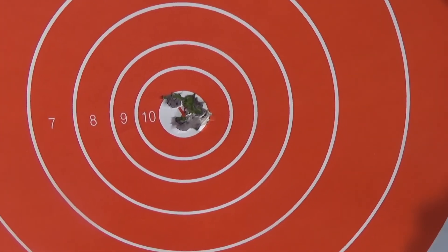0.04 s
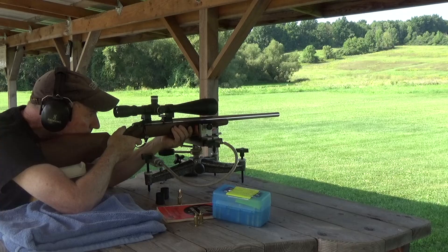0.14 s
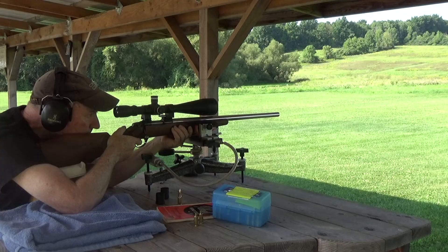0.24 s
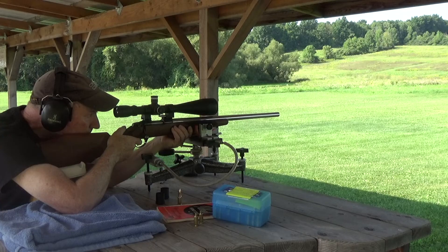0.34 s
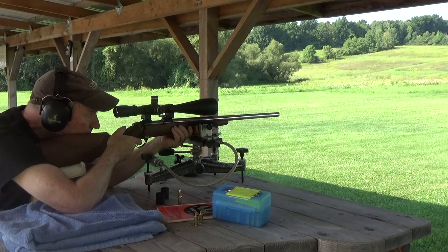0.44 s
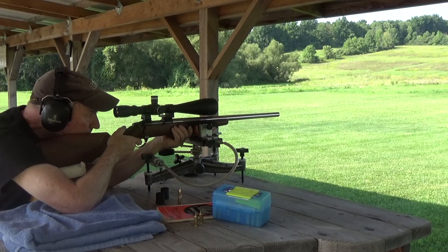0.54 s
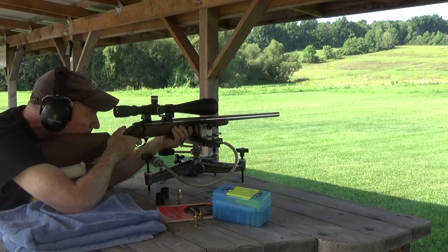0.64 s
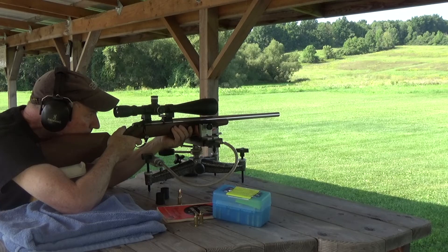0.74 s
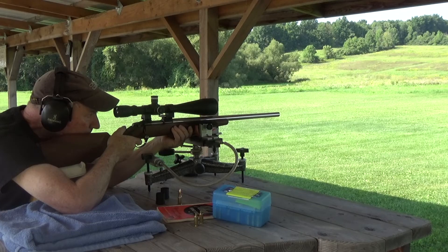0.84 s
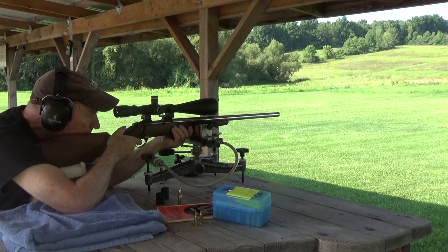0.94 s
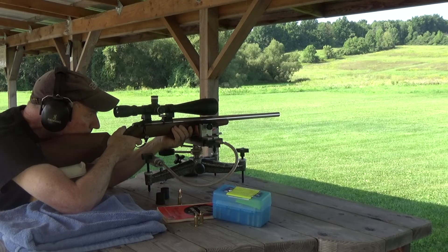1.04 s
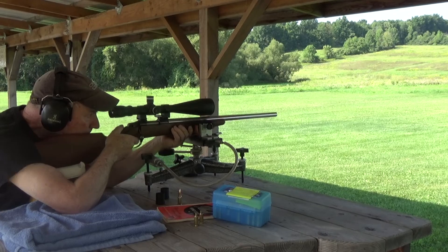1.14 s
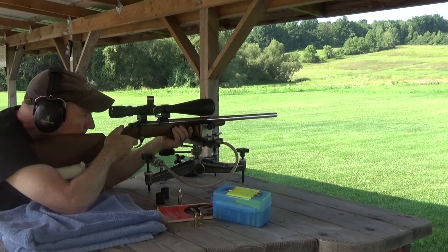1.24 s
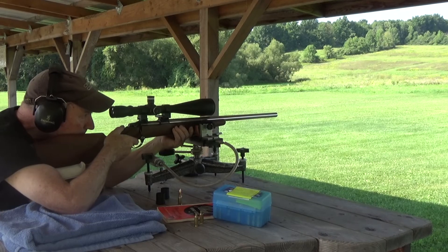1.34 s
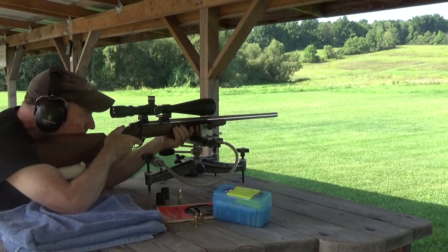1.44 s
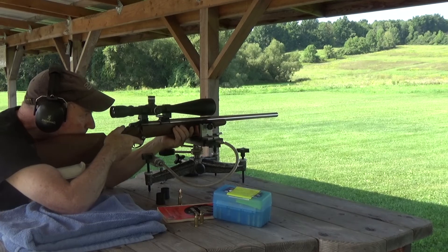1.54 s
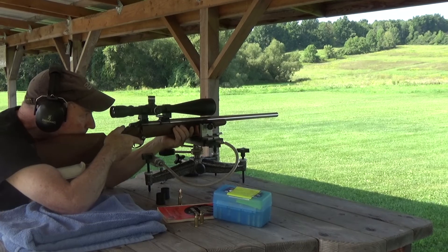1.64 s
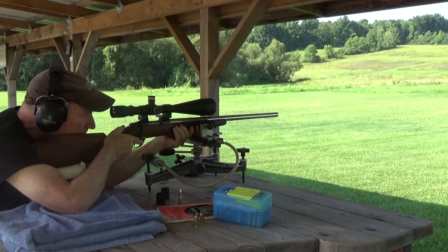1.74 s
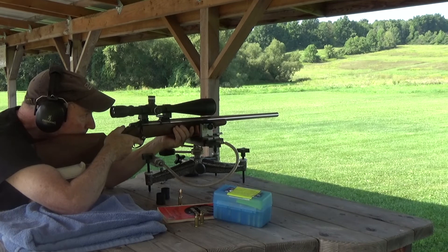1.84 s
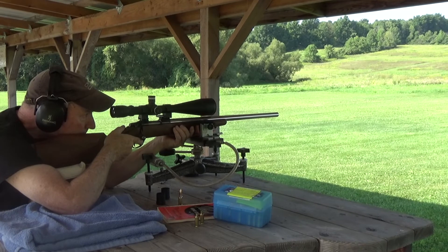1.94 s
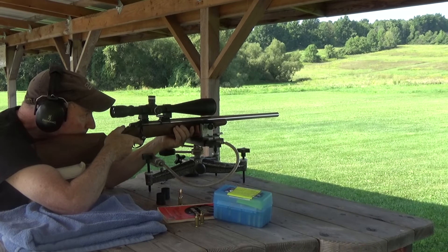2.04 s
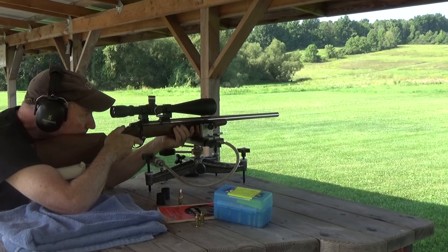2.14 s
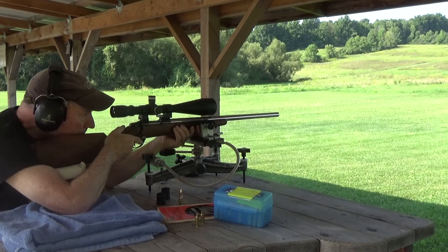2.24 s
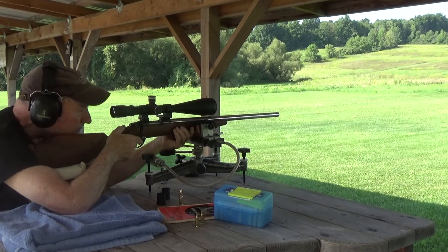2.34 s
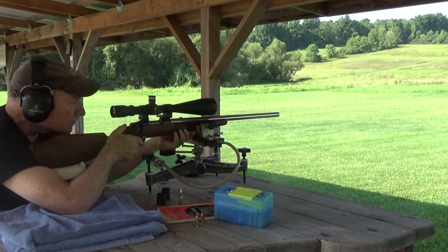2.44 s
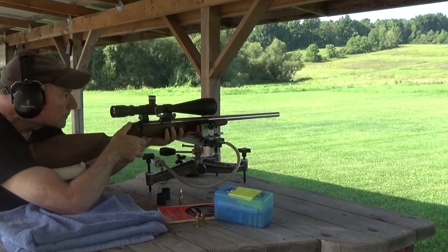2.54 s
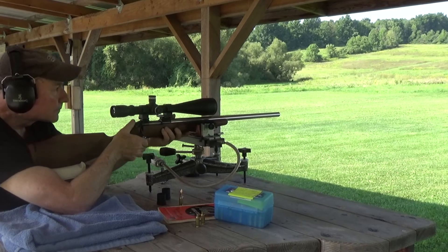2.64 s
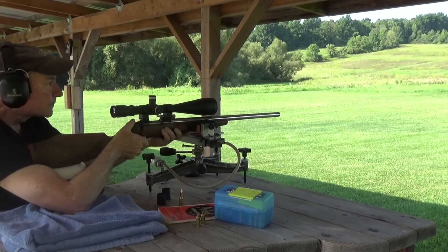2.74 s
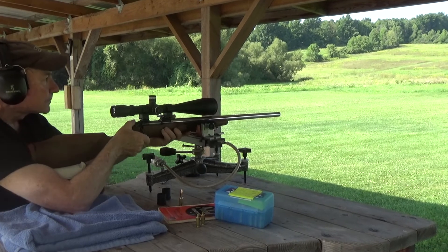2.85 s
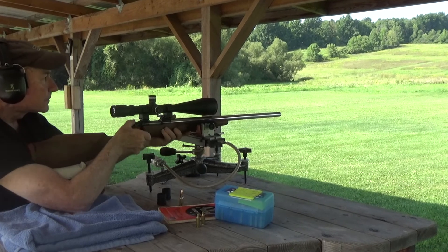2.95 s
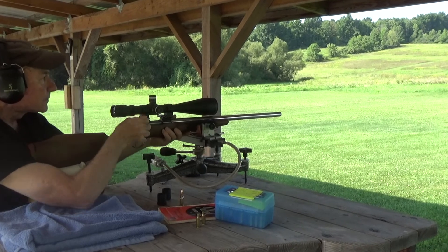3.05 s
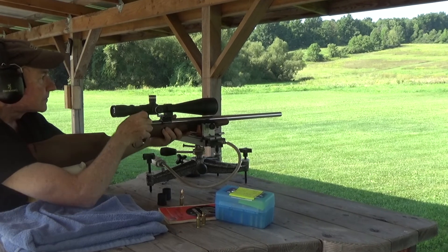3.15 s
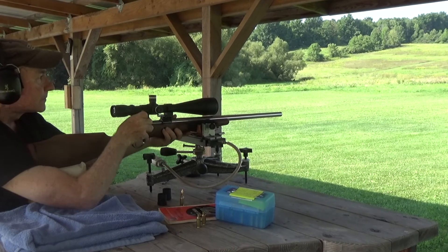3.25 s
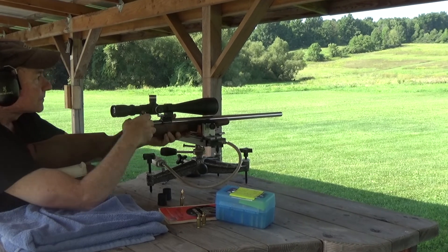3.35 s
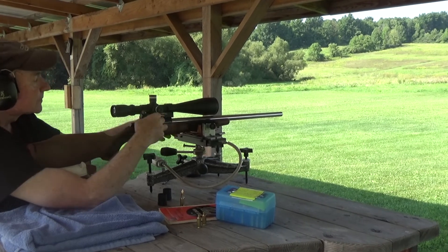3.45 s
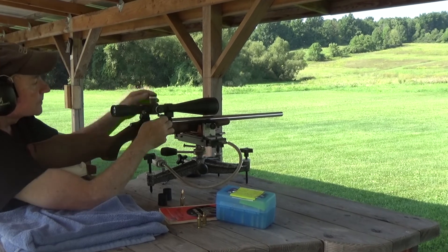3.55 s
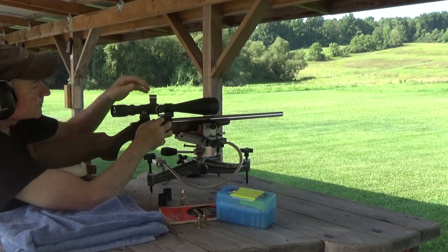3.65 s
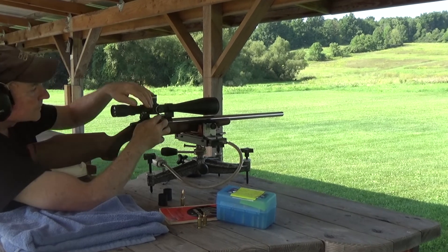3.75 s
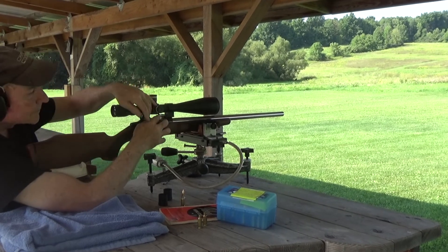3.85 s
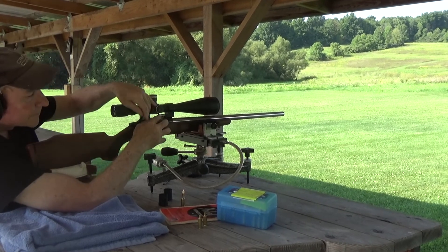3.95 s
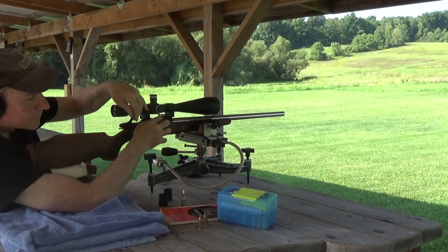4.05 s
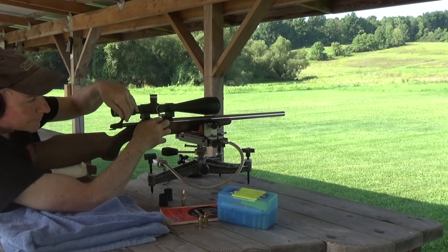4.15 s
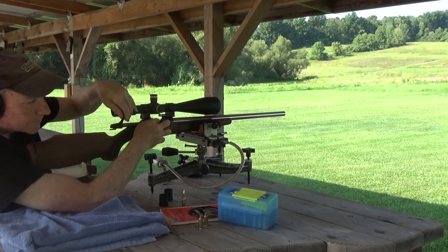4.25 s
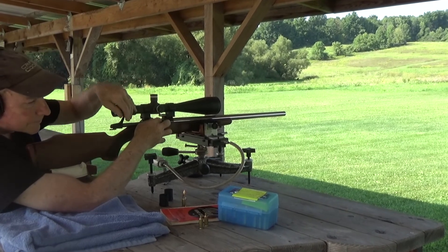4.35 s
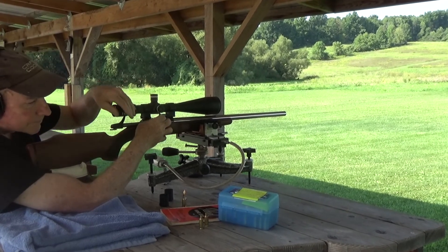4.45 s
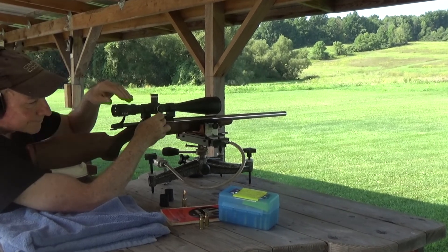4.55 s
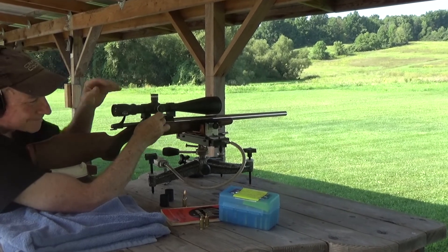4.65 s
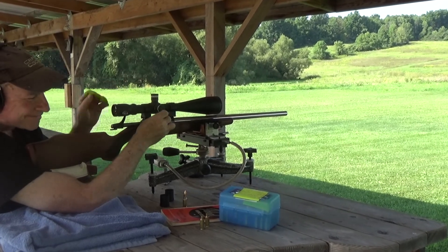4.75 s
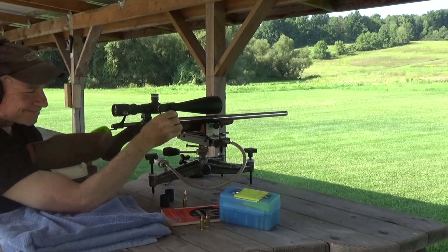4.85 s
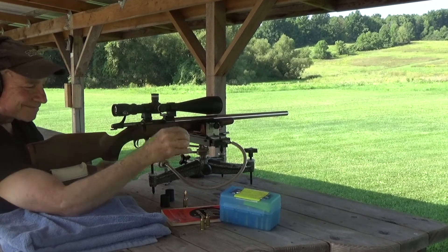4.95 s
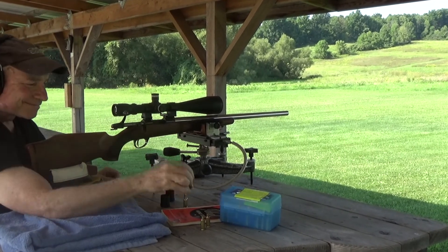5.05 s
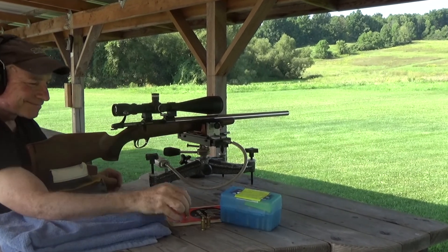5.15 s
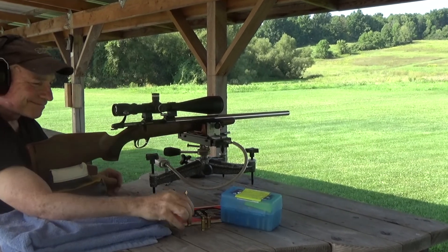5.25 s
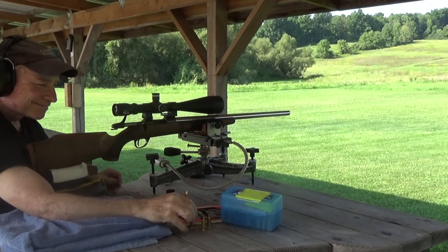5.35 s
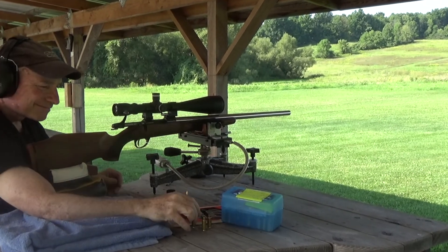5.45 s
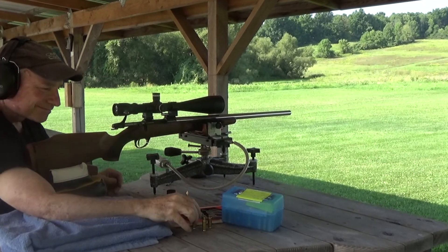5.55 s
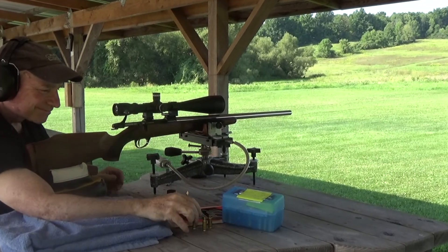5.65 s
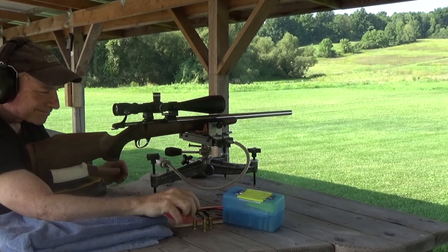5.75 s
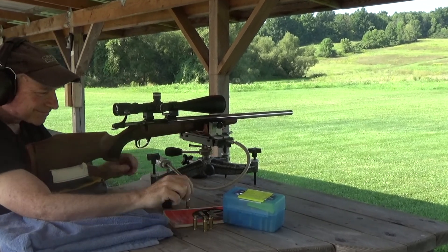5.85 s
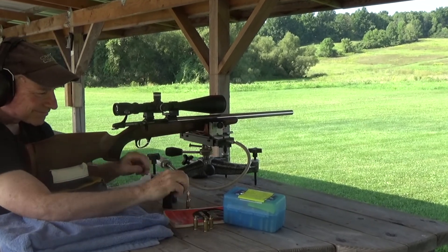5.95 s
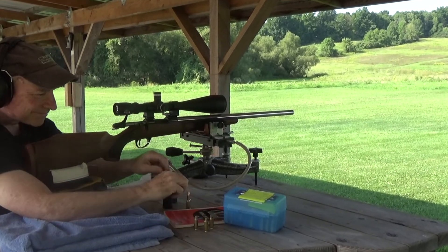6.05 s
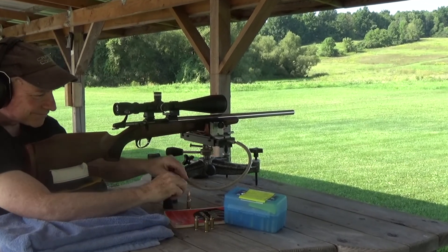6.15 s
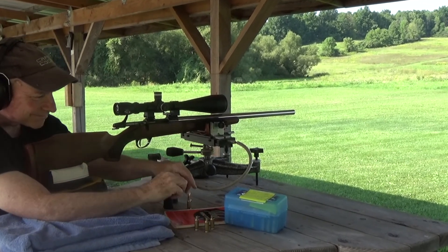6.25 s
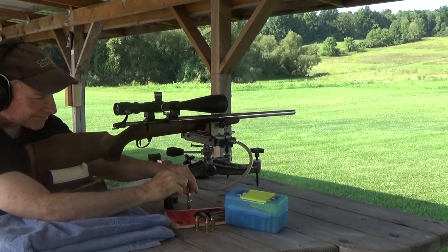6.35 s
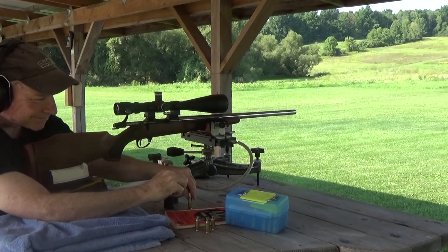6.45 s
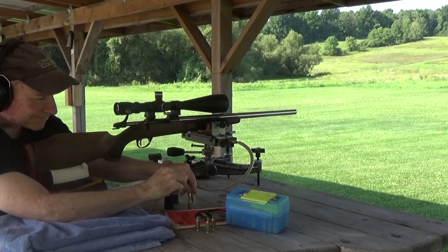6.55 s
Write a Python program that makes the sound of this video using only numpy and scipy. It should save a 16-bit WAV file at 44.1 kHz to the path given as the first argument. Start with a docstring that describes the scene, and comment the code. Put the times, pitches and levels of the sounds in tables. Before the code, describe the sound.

One loud rifle shot echoes across an outdoor range, followed by steel bolt clicks, while katydids and crickets chirr steadily.

```python
"""A summer rifle range. Katydids and crickets scrape their wings over far traffic; just after the
start the sound cuts out briefly. A faint shot comes from far off. Then a rifle fires once under a
wooden roof and the blast rolls back from trees and hills; gain control ducks and recovers slowly.
The steel bolt is lifted and drawn, the brass case rings and is set down, and a faint insect ticks."""
import sys
import numpy as np
from scipy import signal
from scipy.fft import rfft, irfft
from scipy.io import wavfile
from scipy.ndimage import uniform_filter1d

SR = 44100
rng = np.random.default_rng(int(sys.argv[2]) if len(sys.argv) > 2 else 0)


def transcribe(u):
    """Save the signal u as a 16-bit wav file named by the first command-line argument.

    u: samples, shape (n,) or (channels, n), limited to [-1, 1]; the rate is SR.
    q: integer samples, one column per channel.
    """
    v = np.clip(np.atleast_2d(u).T, -1, 1)
    q = np.round(v * 32767).astype(np.int16)
    wavfile.write(sys.argv[1], SR, q)


N = 291138


def amp(db):
    return 10 ** (np.asarray(db) / 20)


def unit_rms(x):
    return x / np.sqrt(np.mean(x ** 2) + 1e-20)


def curve_at(points, hz):
    point_hz, value = np.transpose(points)
    return np.interp(np.log(hz + 1), np.log(point_hz + 1), value)


def add(mix, start_s, sound):
    part = mix[..., round(start_s * SR):][..., :sound.shape[-1]]
    part += sound[..., :part.shape[-1]]


def panned(x, left_db):
    return amp([[left_db / 2], [-left_db / 2]]) * x


def swell(t, start_s, rise_s, hold_s, db, fall_db_per_s):
    """Envelope: rise, hold, steady decay."""
    falling_s = np.maximum(t - start_s - rise_s - hold_s, 0)
    return np.clip((t - start_s) / rise_s, 0, 1) * amp(db - fall_db_per_s * falling_s)


def resonate(x, hz, width_hz, stages):
    """Cascaded resonance at a fixed or moving pitch: shift to 0 Hz, smooth, shift back."""
    carrier = np.exp(2j * np.pi * np.cumsum(np.broadcast_to(hz, x.shape[-1])) / SR)
    pole = np.exp(-np.pi * width_hz / SR)
    for _ in range(stages):
        x = 2 * (carrier * signal.lfilter([1 - pole], [1, -pole], x / carrier)).real
    return x


def stereo_noise(count, colour_db, correlation, patchy_db):
    """Two partly alike channels; colour_db(hz, t) shapes each short spectrum."""
    frames, hz = count // 256 + 5, np.fft.rfftfreq(1024, 1 / SR)
    re, im, other_re, other_im, patches = rng.standard_normal((frames, len(hz), 5)).T
    patches = unit_rms(uniform_filter1d(uniform_filter1d(patches, size=12, axis=0), size=6, axis=1))
    alike = np.clip(curve_at(correlation, hz), -1, 1)[:, None]
    left = re + 1j * im
    right = alike * left + np.sqrt(1 - alike ** 2) * (other_re + 1j * other_im)
    gain = amp(colour_db(hz[:, None], np.arange(frames) * 256 / SR) + patchy_db * patches)
    return signal.istft(np.array([left, right]) * gain, nperseg=1024, noverlap=768)[1][:, :count]


def burst(hz, t60_s, width_oct):
    """Decaying puff of noise around one pitch."""
    t = np.arange(8192) / SR
    bin_hz = np.fft.rfftfreq(len(t), 1 / SR) + 1
    band = np.exp(-(np.log2(bin_hz / hz) / width_oct) ** 2 / 2)
    puff = irfft(rfft(rng.standard_normal(len(t))) * band)
    return unit_rms(puff) / 2 * amp(-60 * t / t60_s) * np.minimum(t / .0005, 1)


def field():
    """Far traffic, air and far insects merge into steady noise."""
    # bed spectrum: (frequency [Hz], relative density [dB])
    spectrum = [(30, -18), (70, -33), (184, -7), (230, -11), (266, -19), (962, -19), (3220, -25.5),
                (4300, -19), (5200, -5), (5900, -16.5), (6550, -17.5), (9000, -16), (10800, -70),
                (14800, -32.5)]
    # left-right likeness: (frequency [Hz], correlation [0-1])
    correlation = [(60, 0.61), (130, 1.0), (290, 0.99), (640, 0.66), (1410, 0.07), (3100, 0.76),
                   (6820, 0.79), (15000, 0.6)]
    bed = stereo_noise(N, lambda hz, t: curve_at(spectrum, hz), correlation, patchy_db=-2.54)
    return amp(-52) * unit_rms(bed)


def wings(hz, width_hz, teeth_per_s=6000):
    """Irregular tooth clicks ring a wing."""
    teeth = rng.uniform(-1, 1, (N, 2)).T * (rng.random((N, 2)).T < teeth_per_s / SR)
    teeth[1] = .9 * teeth[0] + .45 * teeth[1]
    return resonate(teeth, hz, width_hz, stages=3)


def katydids():
    """Far singers blend to a rasp; near ones throb, the pitch falling through each stroke."""
    # near katydids: (stroke rate [1/s], offset [strokes], share of chorus power [0-1])
    singers = [(15.75, .5, .27), (16.52, -.47, .15), (16.77, .03, .11), (17.13, .48, .12)]
    t = np.arange(N) / SR
    far_share = 1 - sum(share for _, _, share in singers)
    chorus = np.sqrt(far_share) * unit_rms(wings(hz=8300, width_hz=980))
    for rate_hz, offset, share in singers:
        phase = (rate_hz * t + offset + .5) % 1
        strokes = np.sin(np.pi * phase) ** 1.15 * wings(hz=9000 - 1400 * phase, width_hz=1100)
        chorus += np.sqrt(share) * unit_rms(strokes)
    grass_absorption = signal.butter(6, 9900, fs=SR, output="sos")
    return amp(-37) * signal.sosfilt(grass_absorption, chorus)


def insect_whines():
    """Thin, wavering tones of far insects: noise in narrow resonances."""
    # insect tones: (pitch [Hz], width [Hz], level [dB])
    tones = [(4050, 60, -67), (5600, 150, -54)]
    return sum(amp(db) * unit_rms(resonate(rng.standard_normal((N, 2)).T, hz, width_hz, stages=2))
               for hz, width_hz, db in tones)


def insect_pips(mix, length_s=.013):
    """Brief whistles of steady pitch."""
    # insect pips: (time [s], pitch [Hz], level [dB])
    pips = [(0, 4250, -38), (.003, 4900, -42), (.015, 5250, -35.5), (.02, 4220, -41)]
    t = np.arange(0, length_s, 1 / SR)
    for start_s, hz, db in pips:
        add(mix, start_s, amp(db) * np.sin(np.pi * t / length_s) * np.sin(2 * np.pi * hz * t))


def knocks(mix):
    """Dull knocks and slaps, each a damped band of noise."""
    # impacts: (time [s], level [dB], centre [Hz], width [octaves], t60 [s])
    impacts = [(.009, -25, 1160, .4, 0.012), (.693, -42, 110, 1.1, .12), (.881, -39.5, 1990, 0.71, .06),
               (1.552, -7, 2800, 1.2, 0.049), (2.183, -25, 700, 1.0, 0.09), (2.184, -36, 120, 1.0, .12),
               (3.08, -30, 900, 1.16, 0.24), (4.165, -34, 260, .45, 0.15), (4.027, -30, 1300, .6, .05),
               (4.568, -38, 910, 1.1, 0.057), (5.56, -25.5, 1410, 0.85, 0.043),
               (5.564, -32.5, 1050, 0.48, 0.044), (5.576, -34.5, 880, 0.38, 0.055)]
    for start_s, db, hz, width_oct, t60_s in impacts:
        add(mix, start_s, amp(db) * burst(hz, t60_s, width_oct))


def shelter(x, t60_s=.23):
    """Roof, posts and bench scatter near sounds: sparse taps of random sign."""
    count = SR // 2
    taps = np.zeros((2, count))
    delays = np.arange(100, count - 10, 10) + rng.integers(0, 10, (2, (count - 101) // 10))
    np.put_along_axis(taps, delays, rng.choice([-1., 1.], delays.shape), 1)
    taps[1] = .91 * taps[0] + .28 * taps[1]
    taps = signal.lfilter([1], [1, -.3], taps * amp(-60 * np.arange(count) / SR / t60_s))
    return signal.fftconvolve(x[None], taps / np.linalg.norm(taps[0]), axes=1)[:, :N]


def cricket_chirp(hz, spacing_s, left_db, db, smear_t60_s=.12):
    """Three wing strokes, each a falling whistle with a faint octave; grass and posts smear them."""
    t, chirp = np.arange(0, .021, 1 / SR), np.zeros(SR // 4)
    phase = 2 * np.pi * np.cumsum(hz * (1 - .1023 * t / t[-1])) / SR
    stroke = (np.sin(phase) + .12 * np.sin(2 * phase)) * np.sin(np.pi * t / t[-1]) ** .42
    for k, swell_db in enumerate((-3.5, -.5, .3)):
        catch_db = 3 * np.cos(2 * np.pi * (230 * t + rng.random()))  # the scraper catches unevenly
        add(chirp, k * spacing_s, amp(db + swell_db + catch_db) * stroke)
    smear = rng.standard_normal((2, 3000)) * amp(-60 * np.arange(3000) / SR / smear_t60_s)
    scattered = signal.fftconvolve(chirp[None], smear / np.linalg.norm(smear[0]), axes=1)
    return panned(chirp, left_db) + amp(1) * scattered[:, :len(chirp)]


def crickets(mix):
    """One cricket chirps repeatedly, two others once each."""
    # crickets: (start pitch [Hz], stroke spacing [s], left minus right [dB], level [dB])
    voices = [(5350, .035, -14, -45.5), (4780, .054, -2, -43), (4700, .054, -4, -51.5)]
    # chirps: (time [s], voice [index])
    chirps = [(.216, 0), (.288, 1), (.559, 0), (.922, 0), (2.35, 0), (2.826, 0), (3.244, 0), (3.74, 0),
              (4.512, 0), (4.91, 0), (5.254, 0), (5.572, 0), (5.944, 0), (6.055, 2), (6.388, 0)]
    for start_s, voice in chirps:
        add(mix, start_s, cricket_chirp(*voices[voice]))


def gunshot(arrivals, travel_s, length_s):
    """Blast and echoes merge into noise; the longer the path, the more treble the air absorbs."""
    # blast spectrum: (frequency [Hz], relative density [dB])
    spectrum = [(30, -46), (134, -34), (170, -17), (320, -11), (415, -5.5), (584, 4.5), (1100, 3),
                (3000, -5), (8300, -12), (16000, -27.5)]
    # left-right likeness: (frequency [Hz], correlation [0-1])
    correlation = [(60, .8), (180, .93), (550, .76), (1650, .7), (4970, .78), (9000, .85), (13000, 1)]
    air_db_per_s_khz2 = .35
    t = arrivals[0][0] + np.arange(1, length_s * SR) / SR
    power = np.array([swell(t, *row[:5]) ** 2 for row in arrivals]) + 1e-30
    tilt_db_per_oct = np.array(arrivals)[:, 5] @ power / power.sum(0)

    def colour_db(hz, age_s):
        tilt_db = np.interp(age_s + t[0], t, tilt_db_per_oct) * np.log2(np.clip(hz, 900, 4500) / 900)
        air_loss_db = air_db_per_s_khz2 * (travel_s + age_s) * (hz / 1000) ** 2
        return curve_at(spectrum, hz) + tilt_db - air_loss_db

    roll = stereo_noise(len(t), colour_db, correlation, patchy_db=2)
    midband = signal.sosfilt(signal.butter(2, [400, 1600], "band", fs=SR, output="sos"), roll[:, :4000])
    return t[0], panned(roll / midband.std() * np.sqrt(power.sum(0)), left_db=.27)


def far_shot():
    """A faint shot, dulled by distance."""
    # blast, echoes: (time [s], rise [s], hold [s], level [dB], fall [dB/s], treble tilt [dB/octave])
    arrivals = [(.692, 0.0022, 0.0024, -31.5, 500, -7.5), (.695, 0.0087, .005, -39.5, 139, 3.5),
                (.86, 0.063, .01, -55, 90, 5.5), (1.065, .012, .07, -59, 60, 4.5)]
    return gunshot(arrivals, travel_s=.73, length_s=.6)


def rifle_shot():
    """The near blast and its returns from roof, trees and hills."""
    # blast, echoes: (time [s], rise [s], hold [s], level [dB], fall [dB/s], treble tilt [dB/octave])
    arrivals = [(1.159, .001, 0.04, -16, 150, 8), (1.165, 0.038, 0.023, -8.5, 65, 0.5),
                (1.27, 0.087, 0.021, -17, 51, 4), (1.46, 0.031, .03, -25, 150, 1),
                (1.625, 0.024, 0.013, -26, 72, 9), (1.66, 0.048, 0.062, -25, 110, 3.5),
                (1.84, .12, 0.027, -32, 42.5, 5), (2.2, 0.078, 0.18, -46, 7, 3),
                (2.8, 0.07, .02, -40, 90, 3.5), (2.7, .4, .35, -43.5, 19, 1.5),
                (3.55, 0.19, .15, -47.5, 27, 2), (3.95, 0.082, .05, -43, 40, 2),
                (4.05, 0.23, 0.22, -44, 23, -3), (4.7, 0.28, 0.11, -57, 11, -16)]
    return gunshot(arrivals, travel_s=0, length_s=5.4)


def boom():
    """A low boom builds under the roof and in the valley: noise ringing near one pitch."""
    # boom envelope: (time [s], rise [s], hold [s], level [dB], fall [dB/s])
    envelope = (1.26, .12, .06, -28, 45)
    t = envelope[0] + np.arange(SR) / SR
    low = resonate(rng.standard_normal(len(t)), hz=210, width_hz=220, stages=2)
    low = signal.sosfilt(signal.butter(6, 145, "high", fs=SR, output="sos"), low)
    return t[0], unit_rms(low) * swell(t, *envelope)


def bolt_clicks(mix):
    """Metal scrapes on steel and the action rings."""
    # bolt and case clicks: (time [s], level [dB], centre [Hz], scrape t60 [s])
    clicks = [(1.532, -17, 5600, 0.038), (2.893, -22, 5000, 0.023), (3.064, -28, 3000, 0.09),
              (3.078, -12, 3500, 0.024), (3.083, -9.5, 4650, .04), (3.096, -11.5, 4850, 0.029),
              (3.134, -23, 4000, 0.042), (3.594, -28, 4750, 0.033), (3.885, -18.5, 2972, .015),
              (4.002, -27, 2500, 0.036), (4.027, -21.5, 2740, 0.024), (4.09, -20, 3140, .02),
              (4.127, -25.5, 3500, 0.092), (4.148, -8.5, 4500, 0.012), (4.153, -11, 4520, 0.019),
              (4.16, -11.5, 3700, 0.073), (4.433, -29, 3300, 0.074), (4.559, -17, 5500, .025),
              (4.569, -12, 4740, 0.019), (4.674, -33.5, 3500, 0.07), (4.701, -21.5, 4680, 0.025),
              (4.717, -20, 2980, 0.019)]
    # modes of the action: (frequency [Hz], relative level [dB], t60 [s])
    steel = [(2120, -8, 0.019), (3285, -7, 0.063), (4050, -6, 0.034), (4600, -6, 0.082), (2527, -5, 0.073),
             (1560, -7.5, .09), (5680, -6, 0.036), (6080, 5.5, 0.037), (7540, -4, .04), (8100, -2, 0.05),
             (9550, 0, 0.048)]
    mode_hz, mode_db, mode_t60_s = np.transpose(steel)[:, :, None]
    for start_s, db, hz, t60_s in clicks:
        scrape = burst(hz, t60_s, width_oct=.72)
        t = np.arange(len(scrape)) / SR
        spread, phase, grip = rng.standard_normal((3, len(steel), 1))
        shifted_hz = mode_hz * (1 + .03 * grip)  # hand and bolt position detune each mode
        decay = amp(mode_db + 1.1 * spread - 60 * t / mode_t60_s)
        modes = decay * np.sin(2 * np.pi * (shifted_hz * t + phase))
        add(mix, start_s, amp(db) * (scrape + amp(-17) * modes.sum(0) / 2))


def case_rings(mix, t60_s=.6):
    """The empty brass case is knocked: one high mode, split into a beating pair."""
    # taps on the case: (time [s], level [dB])
    taps = [(4.149, -43), (4.216, -51.5), (4.569, -62)]
    t = np.arange(0, .5, 1 / SR)
    pair = np.sin(2 * np.pi * 13990 * t) + .4 * np.sin(2 * np.pi * 14030 * t)
    for start_s, db in taps:
        add(mix, start_s, amp(db - 60 * t / t60_s) * pair)


def insect_ticks(rate_hz=29.5):
    """A faint insect ticks quickly and a little unevenly."""
    t = np.arange(0, 1.5, 1 / SR)
    jitter = .23 * unit_rms(uniform_filter1d(rng.standard_normal(len(t)), size=3000))
    tick_count = np.maximum.accumulate(np.floor(rate_hz * t + jitter))
    impulses = np.diff(tick_count, prepend=0) * amp(2 * rng.standard_normal(len(t)))
    tick = burst(hz=2800, t60_s=.021, width_oct=.19)
    return amp(-74) * unit_rms(signal.oaconvolve(impulses, tick)[:len(t)])


def scene():
    mix = field() + katydids() + insect_whines()
    add(mix, *rifle_shot())
    add(mix, *far_shot())
    add(mix, *boom())
    add(mix, start_s=5.2, sound=insect_ticks())
    crickets(mix)
    insect_pips(mix)
    near = np.zeros(N)
    bolt_clicks(near)
    case_rings(near)
    knocks(near)
    return mix + panned(near, left_db=1.2) + amp(-6) * shelter(near)


def record(dry):
    """Microphone bass cut, fast-duck slow-release gain control, soft clip, brief dropout, treble cut."""
    # the sound cuts out: (time [s], gain [dB])
    dropout = [(.03, 0), (.04, -25), (.056, -70), (.109, -70), (.112, -12), (.122, 0)]
    threshold_db, release_db_per_s, ceiling, cutoff_hz = -13, 3.2, .46, 15900
    t = np.arange(N) / SR
    heard = signal.sosfilt(signal.butter(2, 85, "high", fs=SR, output="sos"), dry)
    power_db = 10 * np.log10(abs(uniform_filter1d((heard ** 2).mean(0), size=600)) + 1e-12)
    release_db = release_db_per_s * t
    held_db = np.maximum.accumulate(power_db + release_db) - release_db
    duck_db = np.maximum(held_db - threshold_db, 0)
    clipped = ceiling * np.tanh(heard / amp(duck_db) / ceiling)
    clipped *= amp(np.interp(t, *np.transpose(dropout)))
    lowpass = signal.firwin(511, cutoff_hz, window=("kaiser", 9), fs=SR)
    return signal.oaconvolve(clipped, lowpass[None], "same")


dry = scene()
out = record(dry)
transcribe(out)
```